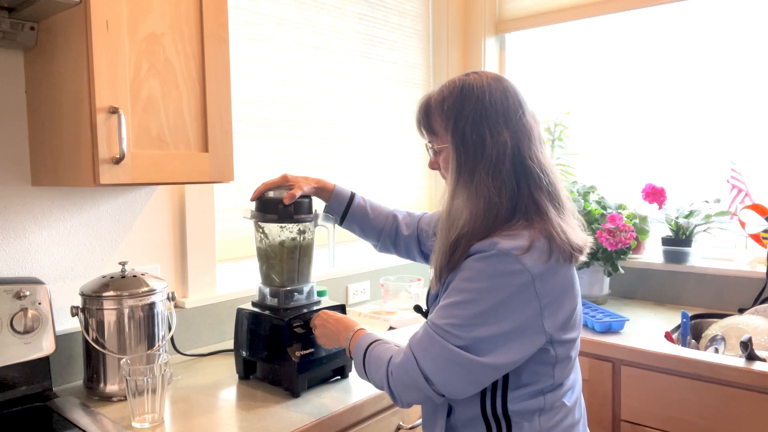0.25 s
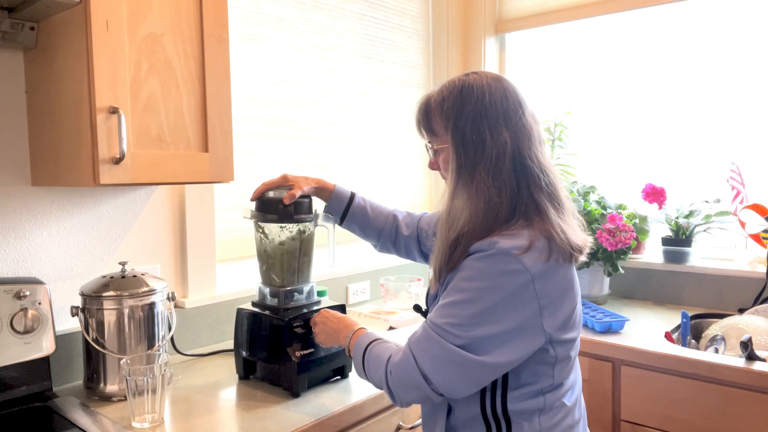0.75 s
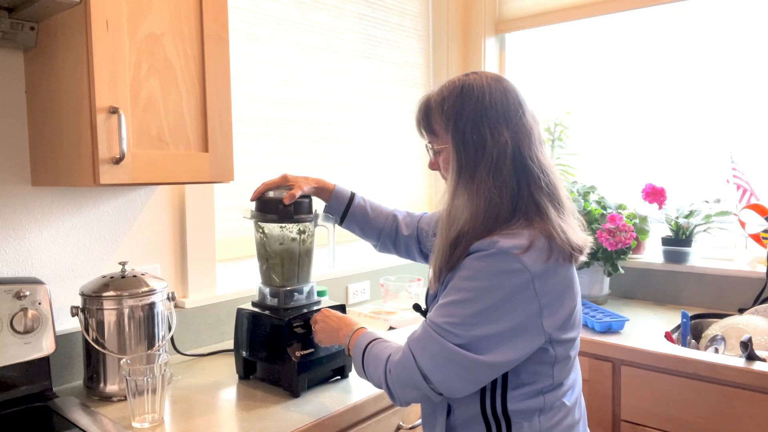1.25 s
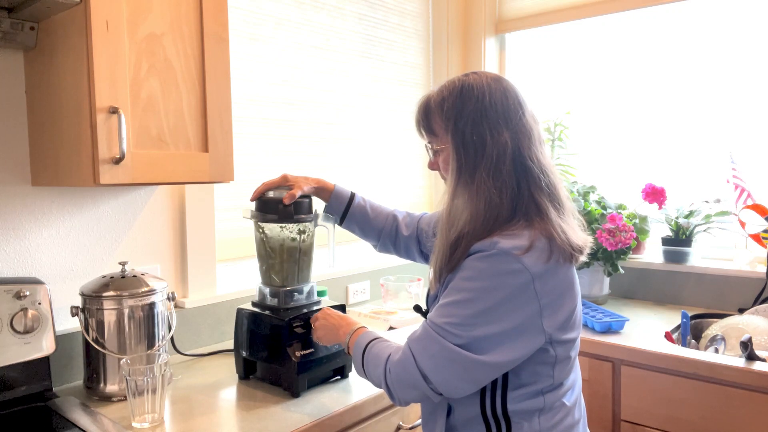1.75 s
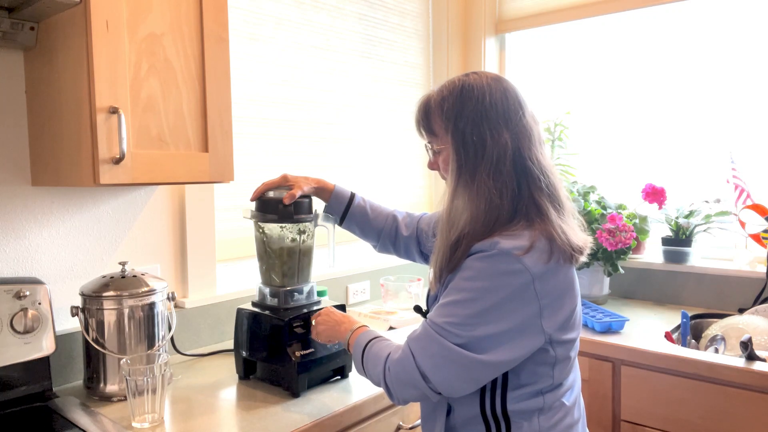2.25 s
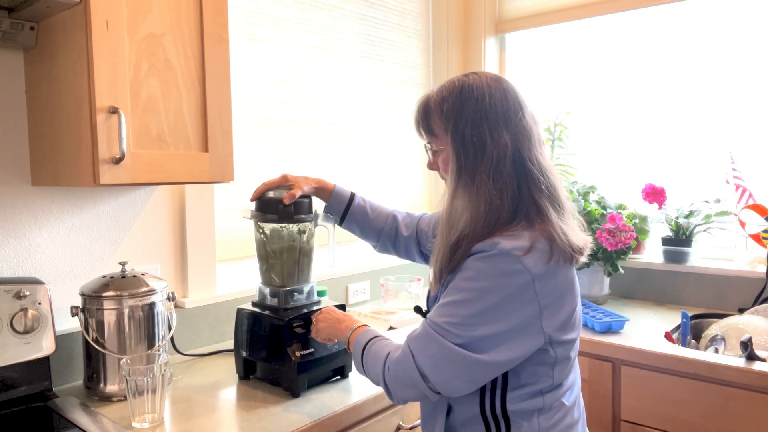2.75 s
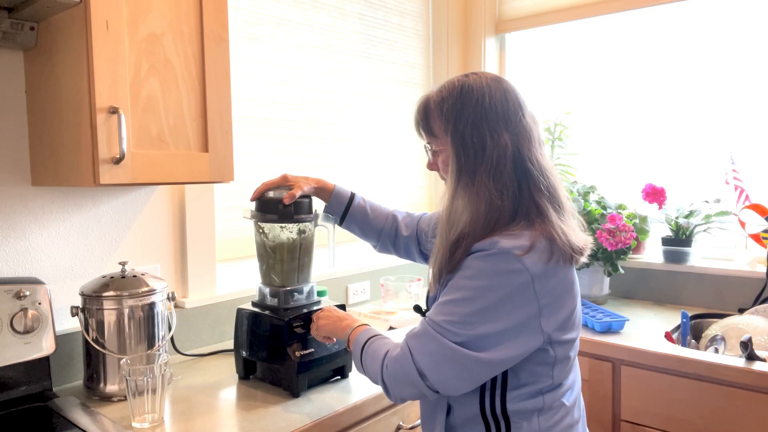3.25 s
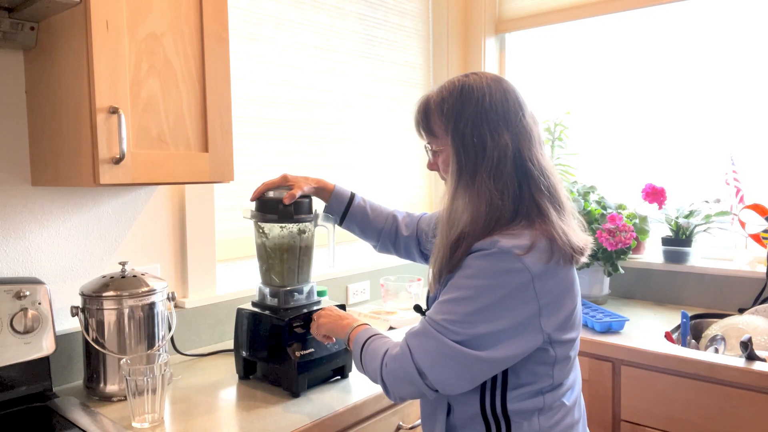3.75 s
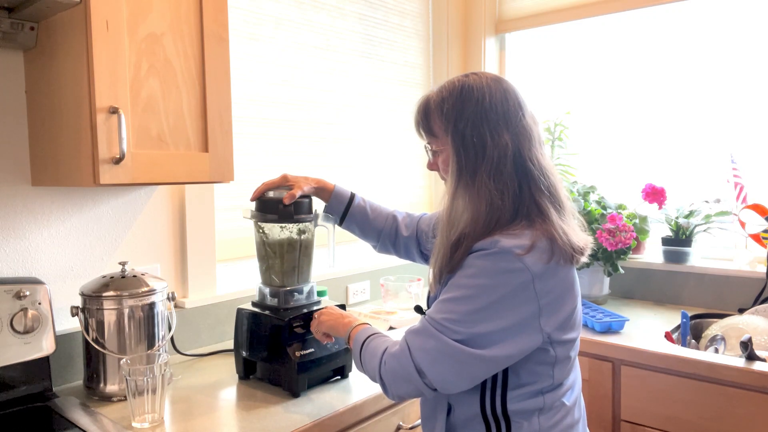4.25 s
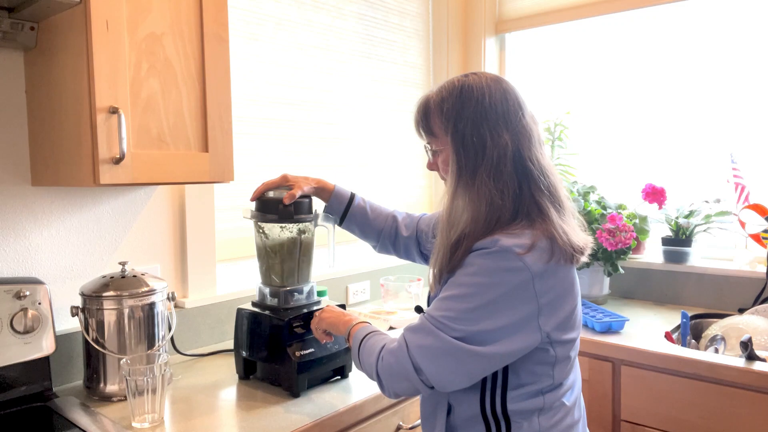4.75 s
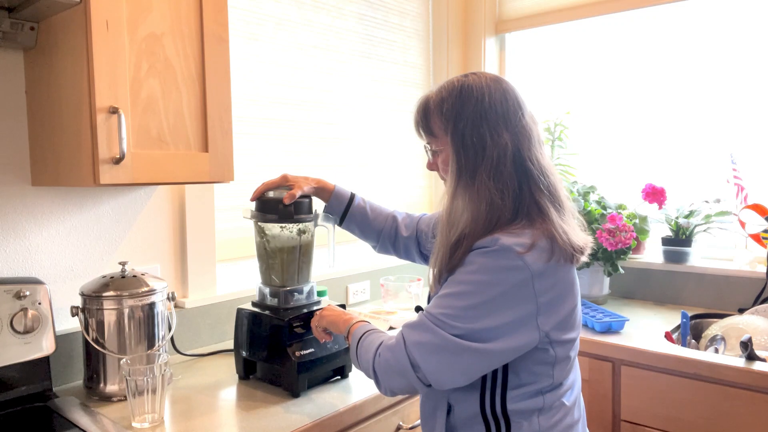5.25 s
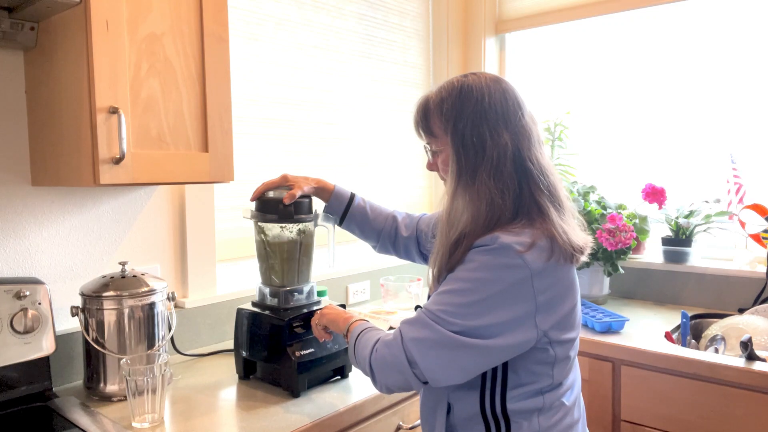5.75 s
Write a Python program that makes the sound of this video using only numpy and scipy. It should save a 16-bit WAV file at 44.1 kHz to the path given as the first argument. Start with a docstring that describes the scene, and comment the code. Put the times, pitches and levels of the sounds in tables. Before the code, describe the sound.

In a small kitchen, close and fairly dry, ice and fruit crunch in a blender jar: sharp cracks, gritty crackle, hollow gulps and wet slosh in uneven bursts. Crunching is densest from one to four seconds, thins out, then surges around five. A faint pulsing motor whir underneath slowly grows.

```python
"""Ice and fruit crunch, crackle and slosh in a blender jar, over a faint pulsing whir that slowly grows.
Dense random collisions are coloured into slosh, grit and fizz, and swell in short crunches and between them.
Noise bursts make chunks crack and bright clinks ring; gliding sines make air pockets gulp; noise makes the
jar roar. The motor is resonant noise pulsing with the shaft; a short noise tail makes the kitchen answer."""
import sys
import numpy as np
from scipy import signal
from scipy.fft import rfft, irfft, next_fast_len
from scipy.io import wavfile
from scipy.ndimage import uniform_filter1d, minimum_filter1d

SR = 44100
rng = np.random.default_rng(int(sys.argv[2]) if len(sys.argv) > 2 else 0)


def store_wav(level_fs):
    """Save 16-bit WAV to argv[1]."""
    pcm = np.round(np.clip(np.atleast_2d(level_fs), -1, 1) * 32767)
    wavfile.write(sys.argv[1], SR, pcm.T.astype(np.int16))


N = 264159

# batches of ice caught and ground by the blade, levels before each layer's trim:
# start t/s, length t/s, grit level/dB, slosh level/dB, fizz of the finest splinters level/dB
CRUNCH_BATCHES = [(0.126, 0.031, -11, -11, -32), (0.395, 0.073, -19.5, -12.5, -24),
                  (0.506, 0.089, -18.5, -7.5, -21.5), (0.702, 0.066, -20.5, -10, -31),
                  (0.838, 0.11, -22, -12.5, -32), (0.953, 0.074, -16, -3.5, -21),
                  (1.072, 0.048, -12, -3, -17), (1.199, 0.046, -13.5, -4.5, -22),
                  (1.328, 0.055, -27, -8.5, -15), (1.479, 0.044, -15.5, -7, -18),
                  (1.531, 0.068, -15, -8.5, -19), (1.627, 0.025, -22, -25, -8.5),
                  (1.75, 0.11, -23.5, -24, -25), (1.844, 0.033, -16.5, -12, -17),
                  (2.138, 0.044, -21, -10.5, -28), (2.254, 0.068, -13.5, -4.5, -17),
                  (2.386, 0.11, -21, -11, -26), (2.508, 0.069, -21, -27, -22), (2.587, 0.038, -2, -8, -4.5),
                  (2.696, 0.062, -13.5, -9, -15.5), (2.765, 0.063, -19, -8, -29),
                  (2.834, 0.06, -13, -3.5, -19), (2.912, 0.1, -20, -10.5, -21),
                  (3.088, 0.039, -11.5, -9, -18), (3.201, 0.093, -16, -14, -13.5),
                  (3.373, 0.18, -19, -6, -19.5), (3.568, 0.075, -21, -5.5, -24),
                  (3.774, 0.067, -13.5, -15, -18), (3.847, 0.071, -14.5, -8.5, -11.5),
                  (4.073, 0.15, -26, -14.5, -47), (4.633, 0.042, -18, -12, -21),
                  (4.828, 0.09, -11.5, -11.5, -16.5), (4.938, 0.051, -22, -26, -27),
                  (5.038, 0.035, 2.5, -2.5, -3), (5.074, 0.14, -15.5, -9, -21),
                  (5.392, 0.087, -19.5, -10, -18), (5.435, 0.049, -13, -7, -42)]
# resonances of the steel blade: f/Hz, width f/Hz, level/dB
BLADE_MODES = [(1952, 72, 2), (2833, 200, -0.5), (4230, 490, -10), (5875, 148, 6)]
# resonances of the jar wall: f/Hz, width f/Hz, level/dB
WALL_MODES = [(581, 17, -7.5), (715, 230, -5), (1105, 42, -14), (1340, 240, -3)]
# colour of hard fragments, relative: f/Hz, level/dB
GRIT_COLOUR = [(900, -7), (1900, 2), (6300, 3), (7600, -12.5), (13000, -1)]
# dull colour of blows and scouring on the jar, relative: f/Hz, level/dB
KNOCK_COLOUR = [(170, -33), (300, 4), (900, 8.5), (1500, -7.5), (3500, -26)]
# central pitch in Hz and its random spread (natural log), for slaps and for knocks on the jar
SLAP_HZ, SLAP_SPREAD = 750.8, 0.28


def churn():
    """Dense little collisions: soft ones slosh and bubble, hard ones crackle as grit."""
    crunch_slosh, crunch_grit, crunch_fizz = crunching()
    stir_slosh, stir_grit = stirring()
    slosh = np.hypot(crunch_slosh, stir_slosh) * sloshing()
    grit, fizz = grinding()
    return slosh, crunch_grit * grit + crunch_fizz * fizz + stir_grit * swirling()


def crunching(grit_db=-5, slosh_db=-6, fizz_db=-4):
    """Gains of slosh, grit and fizz while the blade works through each batch of ice."""
    power = np.zeros((3, N))
    for s, length, grit, slosh, fizz in CRUNCH_BATCHES:
        soft = bite(s, length, attack_s=0.0066, sag_db_per_s=16, release_s=0.0097)
        hard = bite(s, length, attack_s=0.019, sag_db_per_s=64, release_s=0.0041)
        gains = [amp(slosh + slosh_db) * soft, amp(grit + grit_db) * hard, amp(fizz + fizz_db) * hard]
        power += np.square(gains)
    return np.sqrt(power)


def bite(start_s, length_s, attack_s, sag_db_per_s, release_s):
    """Envelope of one crunch: the blade catches, the batch wears down, the rest falls away."""
    age = np.maximum(np.arange(N) / SR - start_s, 0)
    wear = amp(-sag_db_per_s * (np.minimum(age, length_s) - length_s / 2))
    release = np.exp(-np.maximum(age - length_s, 0) / release_s)
    return np.minimum(age / attack_s, 1) * wear * release


def stirring(grit_db=-2, slosh_db=-2, lull_db=-7.5, lull_lead_s=0.012, lull_width_s=0.0075):
    """Gains of slosh and grit as the slurry circulates; they lull just before every crunch."""
    # steady stirring, levels before the trims and lulls: t/s, slosh level/dB, grit level/dB
    circulation = [(0.0, -31, -39), (0.43, -38, -43), (0.73, -24.5, -35), (1.03, -19.5, -25.5),
                   (1.48, -15.5, -34.5), (1.98, -39.5, -39), (2.17, -31.5, -41), (2.38, -13.5, -29),
                   (2.69, -16.5, -25), (3.27, -27.5, -28.5), (3.42, -22, -32), (3.97, -25.5, -24),
                   (4.39, -31, -34.5), (4.69, -27, -32), (5.04, -10, -19), (5.25, -26, -27),
                   (5.69, -19.5, -24), (5.99, -21, -27.5)]
    t = np.arange(N) / SR
    s, slosh, grit = np.transpose(circulation)
    # the blade spins in an air pocket just before it catches
    starts = [batch[0] for batch in CRUNCH_BATCHES]
    lull = lull_db * sum(np.exp(-((t - start + lull_lead_s) / lull_width_s) ** 2) for start in starts)
    return amp(np.interp(t, s, slosh) + lull + slosh_db), amp(np.interp(t, s, grit) + lull + grit_db)


def sloshing():
    """Bubbles ring, soft lumps knock, and the jar wall resonates with the slurry."""
    # colour of the wet slurry, relative: f/Hz, level/dB
    slurry_colour = [(180, -33.5), (245, 7), (420, 5), (560, -10.5), (740, -1), (1100, -10), (1900, -17),
                     (4000, -38)]
    bubbles = rings(count=2400, low_hz=199.4, high_hz=2617, t60=0.092)
    # soft lumps of fruit knock against the wall
    knocks = unit(rng.standard_normal(N) * clumps(rate=83, decay_s=0.0018))
    slurry = shaped(bubbles + amp(3) * knocks, slurry_colour)
    slosh = unit(slurry + resonated(slurry, WALL_MODES))
    # level out the slosh so that no single surge stands out
    surge = np.sqrt(np.abs(uniform_filter1d(slosh ** 2, size=900)) + 0.5)
    return unit(slosh / surge)


def grinding(fizz_hz=8150):
    """Clumped hard impacts crackle; the finest splinters, above fizz_hz, are split off as fizz."""
    # grit comes in tiny clumps, one for each fragment that meets the blade
    catches = clumps(rate=170, decay_s=0.0012) + 0.7
    crackle = grains(N, rate=10000, spread_db=0.5) * catches
    grit = shaped(tumbling(crackle, depth_db=6.0), GRIT_COLOUR)
    fizz = irfft(rfft(grit) * (np.fft.rfftfreq(N, 1 / SR) > fizz_hz), N)
    return unit(grit - fizz), unit(fizz)


def swirling():
    """Fine crumbs swirl past more evenly, dulled by the slurry, and keep the steel singing."""
    # dulling of grit that is only stirred, relative: f/Hz, level/dB
    submerged = [(1500, 9), (6000, 4), (13000, 3.5)]
    catches = clumps(rate=220, decay_s=0.002) + 0.73
    swirl = grains(N, rate=10000, spread_db=6.0) * catches
    fines = shaped(shaped(tumbling(swirl, depth_db=4.5), GRIT_COLOUR), submerged)
    return unit(fines + amp(-6.5) * resonated(fines, BLADE_MODES))


def rings(count, low_hz, high_hz, t60):
    """Many short damped tones at random moments, each with a pitch of its own."""
    t = np.arange(SR // 20) / SR
    when, pitch, phase = rng.random((3, count, 1))
    hz = low_hz + pitch * (high_hz - low_hz)
    tones = amp(-60 * t / t60) * np.sin(2 * np.pi * (hz * t + phase))
    index = (when * N).astype(int) + np.arange(len(t))
    return unit(np.bincount(index.ravel(), tones.ravel(), N)[:N])


def clumps(rate, decay_s):
    """An envelope of rms 1: sudden uneven catches, rate a second, that each die away."""
    catches = np.abs(grains(N, rate, spread_db=5.5))
    return unit(signal.lfilter([1], [1, -np.exp(-1 / (decay_s * SR))], catches))


def tumbling(x, depth_db):
    """Fragments come and go, each lending its own colour for a few hundredths of a second."""
    z = signal.stft(x, nperseg=512)[2]
    field = uniform_filter1d(rng.standard_normal(z.shape), size=8, axis=1)
    field = uniform_filter1d(field, size=3, axis=1)
    # narrow peaks sit on broader humps
    peaks = unit(uniform_filter1d(field, size=2, axis=0))
    humps = unit(uniform_filter1d(field, size=14, axis=0))
    colour_db = depth_db * np.clip(unit(peaks + 0.5 * humps), -2, 2)
    return signal.istft(z * amp(colour_db), nperseg=512)[1][:N]


def cracks(snap_s=0.0019, crumb_s=0.018, crumb_db=-18, knock_db=-6, ring_db=-8, ring_width_hz=110):
    """Each chunk splits with a dry snap, rings briefly, sheds a spray of crumbs and knocks the jar."""
    # chunks split by the blade: t/s, relative level/dB, pitch of the chunk f/Hz
    splits = [(0.121, -15, 4670), (0.1372, -9.5, 4650), (0.145, -8.5, 2740), (0.1969, -23.5, 6070),
              (0.2632, -13, 1860), (0.4375, -12, 5230), (0.4546, -8.5, 3450), (0.5134, -7, 6040),
              (0.5211, -7.5, 5000), (0.7391, -4.5, 1900), (0.8354, -8.5, 2320), (0.8639, -6.5, 2420),
              (0.944, -10.5, 2380), (0.971, -12, 3020), (1.1089, -9.5, 3340), (1.1766, -6, 2340),
              (1.205, -1, 2490), (1.2092, -4, 5000), (1.232, -6, 2270), (1.2684, -15, 2430),
              (1.4849, 2, 4620), (1.4951, -0.5, 1830), (1.5333, -10, 1380), (1.5488, -7, 1430),
              (1.8573, -9, 4860), (1.869, -13, 1350), (2.1527, -10, 1420), (2.2392, -13.5, 3800),
              (2.257, -3, 4660), (2.3127, -5.5, 2240), (2.3924, -8, 1380), (2.3983, -8, 1420),
              (2.4397, 0, 5190), (2.445, -2.5, 6420), (2.464, -5, 1430), (2.5272, -3, 1390),
              (2.596, -4, 2180), (2.6103, 0.5, 5890), (2.7019, 0.5, 3230), (2.7106, -6, 2900),
              (2.7386, -7, 1390), (2.858, -6.5, 1490), (2.9593, -8, 3570), (3.04, -11, 1380),
              (3.1168, -17, 3140), (3.202, -18, 1410), (3.243, -15.5, 2110), (3.3778, -2, 1400),
              (3.4615, -6.5, 2880), (3.5664, -2, 1730), (3.656, -15, 3440), (3.865, 3, 2480),
              (3.902, -9, 3120), (3.9282, -7.5, 5440), (4.0993, -10.5, 4250), (4.795, -15, 7000),
              (4.827, -12, 3230), (4.8527, -2, 3100), (4.879, -2.5, 1370), (4.9543, 0, 4180),
              (5.0609, 3.5, 6560), (5.1797, -7, 1760), (5.2145, -12, 4400), (5.4566, 5.5, 1810)]
    # colour of breaking ice, relative: f/Hz, level/dB
    ice_colour = [(150, -50), (400, -13), (1500, 12.5), (6200, 4), (7700, -2), (13500, 1.5)]
    out, t = np.zeros(N), np.arange(SR // 10) / SR
    for s, db, chunk_hz in splits:
        snap = rng.standard_normal(len(t)) * np.exp(-t / snap_s)
        crumbs = grains(len(t), rate=3400, spread_db=0) * np.exp(-t / crumb_s)
        blow = snap + amp(crumb_db) * crumbs
        split = struck(blow, ice_colour, chunk_hz, focus_db=7, facet_db=5.5)
        ring = crest(resonated(blow, [(chunk_hz, ring_width_hz, 0)]))
        thud = knock(decay_s=0.00057)
        add(out, s, amp(db) * (split + amp(ring_db) * ring + amp(knock_db) * thud))
    return out


def gulps(lead_s=0.0012, hollow_db=-7, wet_db=-3.0, knock_db=-4.5):
    """Each collapse is a hollow gulp; the slurry slaps the jar and small pockets burst with it."""
    # air pockets collapsing and wet slaps on the jar, loud and faint, levels before the trims:
    # t/s, gulp level/dB, cavity pitch f/Hz (raised to the pocket's floor), wet slap level/dB
    collapses = [(0.004, -18.5, 368, -17.5), (0.12, -4, 422, -34), (0.186, -12, 237, -49),
                 (0.262, -8.5, 328, -11.5), (0.413, 2.5, 415, -7), (0.515, -6.5, 246, -10.5),
                 (0.546, -4.5, 472, -22), (0.641, -5.5, 329, -51), (0.726, 1.5, 310, -5.5),
                 (1.013, -13, 387, -17), (1.082, 1.5, 412.6, -39), (1.177, -2, 335, -7.5),
                 (1.203, -14, 317, -6), (1.346, -7.5, 323, -12.5), (1.487, -7.5, 322, -15.5),
                 (1.547, -4.5, 571, -10), (1.578, -11, 566, -6.5), (1.637, -11, 526, -10.5),
                 (1.683, -10.5, 328, -45), (1.751, -9.5, 357, -50), (1.852, -4.5, 323, -28),
                 (1.976, -13.5, 787, -20.5), (2.15, 5, 397.7, -15), (2.353, -4, 290, -32),
                 (2.393, 0, 437.5, -8), (2.506, -8, 282, -7.5), (2.527, -0.5, 256, -7.5),
                 (2.602, 1, 374, -14), (2.754, -0.5, 279.6, -8), (2.787, 2, 353, -9.5),
                 (2.934, -4.5, 346, -8.5), (3.035, -12, 400, -23), (3.102, 1, 403, -25),
                 (3.147, -1.5, 433, -17.5), (3.278, -6.5, 313, -36), (3.393, -3, 336, -11),
                 (3.606, 0, 389, -13), (3.725, -36, 370, -10.5), (3.835, -2, 295, -15.5),
                 (3.955, -6, 333, -19), (4.033, -11, 375, -44), (4.135, -2, 323, -18.5),
                 (4.167, -10, 420, -9.5), (4.227, -7.5, 390, -16.5), (4.431, -7, 336, -22.5),
                 (4.576, -10, 308, -34), (4.668, -4.5, 329, -17.5), (4.846, 2.5, 279, -37),
                 (4.953, -3, 427, -9), (5.186, -6.5, 297, -15), (5.415, -2.5, 257.4, -16),
                 (5.271, -7.5, 358, -23), (5.46, -3, 331, -11), (5.535, -24, 340, -13),
                 (5.6, -6.5, 241.6, -18), (5.655, -1.5, 308, -16.5), (5.688, -1.5, 349, -37),
                 (5.733, -2.5, 312, -13), (5.844, -6.5, 310, -32)]
    out = np.zeros(N)
    for s, db, cavity_hz, slap_db in collapses:
        slap_hz = SLAP_HZ * np.exp(SLAP_SPREAD * rng.standard_normal())
        bursts = pocket(slap_hz, rise_s=0.00078, t60=0.076, splinter_db=-2.5, lag_s=0.016)
        add(out, s - lead_s, amp(db + hollow_db) * pocket(cavity_hz))
        add(out, s, amp(slap_db + wet_db) * bursts)
        add(out, s, amp(slap_db + knock_db) * knock(decay_s=0.0078))
    return out


def pocket(cavity_hz, rise_s=0.00456, t60=0.12, scatter=0.3597, splinter_db=-9, glide=0.071, lag_s=0.0125):
    """A cavity swells and rings down; smaller and larger pockets break off around it."""
    t = np.arange(SR // 7) / SR
    pitch, bend = rng.standard_normal((2, 6, 1))
    delay, phase = rng.random((2, 6, 1))
    pitch[0], delay[0] = 0, 0  # the main cavity
    age = np.maximum(t - lag_s * delay, 0)
    base_hz = np.maximum(cavity_hz * np.exp(scatter * np.clip(pitch, -2, 1)), 240)  # 240 Hz floor
    # the pitch bends as the slurry squeezes each pocket
    hz = base_hz * (1 + glide * bend * np.tanh(2 * age / t60))
    swell = np.minimum(age / rise_s, 1) ** 2 * amp(-60 * np.maximum(age - rise_s, 0) / t60)
    pockets = swell * np.sin(2 * np.pi * (np.cumsum(hz, 1) / SR + phase))
    return crest(pockets[0] + amp(splinter_db) * pockets[1:].sum(0), size=420)


def clinks(chatter_s=0.019, chatter_db=-7, spread=0.059, sharpness=27):
    """A sharp noise contact with a chattering tail rings in a cluster of close modes."""
    # ringing clinks, and two bright sprays above 10 kHz: t/s, level/dB before a 2 dB lift, pitch f/Hz
    bright_hits = [(0.2614, -16, 2120), (0.332, -28, 2640), (1.3666, -14, 2960), (1.416, -20, 2930),
                   (1.7564, -19.5, 2900), (1.772, -20.5, 4350), (1.797, -20.5, 2990), (1.822, -27, 2930),
                   (2.082, -29.5, 6050), (3.216, -17.5, 6020), (4.139, -22, 12200), (4.232, -18, 2780),
                   (4.448, -22, 5880), (4.639, -21, 5850), (4.7393, -19, 5940), (5.305, -23, 5930),
                   (5.362, -14, 4100), (5.657, -23, 10800), (5.811, -22.5, 3090)]
    out, t = np.zeros(N), np.arange(SR // 10) / SR
    for s, db, pitch_hz in bright_hits:
        envelope = np.exp(-t / 0.0019) + amp(chatter_db) * np.exp(-t / chatter_s)
        contact = rng.standard_normal(len(t)) * envelope
        side_hz = pitch_hz * np.exp(spread * rng.standard_normal(size=3))
        modes = [(pitch_hz, pitch_hz / sharpness, 2)] + [(hz, hz / sharpness, -2) for hz in side_hz]
        add(out, s, amp(db + 2.0) * crest(resonated(contact, modes)))
    return out


def roars():
    """Packed ice scours the jar so densely that its wall roars in its own resonances."""
    # packed ice against the wall: start t/s, length t/s, relative level/dB
    scours = [(2.517, 0.03, -22), (3.097, 0.039, -20), (3.2, 0.025, -14.5), (3.386, 0.027, -18.5),
              (4.844, 0.38, -17)]
    drive = np.zeros(N)
    for s, length, db in scours:
        drive += amp(db) * bite(s, length, attack_s=0.0068, sag_db_per_s=18, release_s=0.0054)
    return drive * unit(resonated(shaped(rng.standard_normal(N), KNOCK_COLOUR), WALL_MODES))


def knock(decay_s):
    """A short dull blow on the wall of the jar, hollowed out around a random pitch."""
    t = np.arange(SR // 10) / SR
    wall_hz = SLAP_HZ * np.exp(SLAP_SPREAD * rng.standard_normal())
    blow = rng.standard_normal(len(t)) * np.exp(-t / decay_s)
    return struck(blow, KNOCK_COLOUR, wall_hz, focus_db=-12, facet_db=4.5)


def struck(blow, spectrum, focus_hz, focus_db, facet_db):
    """A blow coloured by its object: a broad peak or hollow at focus_hz, and random uneven facets."""
    facet_hz, octaves = np.geomspace(300, 16000, num=30), .6
    facets = np.transpose([facet_hz, facet_db * (2 * rng.random(len(facet_hz)) - 1)])

    def gain(hz):
        focus = focus_db / (1 + (np.log2((hz + 1) / focus_hz) / octaves) ** 2)
        return amp(along(spectrum, hz) + focus + along(facets, hz))

    return crest(coloured(blow, gain))


def motor(shaft_hz=157, pulsing=0.23):
    """Cooling air sings in the steel, pulsing with the shaft, growing clearly louder, by about 11 dB overall."""
    # colour of the rushing air, relative: f/Hz, level/dB
    whir = [(30, -71), (260, 37), (800, 28.5), (3000, -17), (6000, -8), (8000, -10)]
    t = np.arange(N) / SR
    air = unit(shaped(rng.standard_normal(N), whir))
    # the shaft speed wanders around its mean
    drift = uniform_filter1d(rng.standard_normal(N), size=4000)
    turns = np.cumsum(shaft_hz * (1 + 0.1192 * unit(drift))) / SR
    pulse = 1 + pulsing * np.sin(2 * np.pi * turns)
    return amp(-42.5 + 1.84 * t) * pulse * (air + resonated(air, BLADE_MODES))


def kitchen(x):
    """Cupboards and counter answer after 4 ms with a short noise tail, decaying at its own rate per band."""
    # decay of the room by 60 dB: f/Hz, t/s
    decay_times = [(200, 0.16), (3000, 0.17), (14000, 0.081)]
    hz, t, z = signal.stft(rng.standard_normal(SR // 2), SR, nperseg=256)
    decay = amp(-60 * t / along(decay_times, hz)[:, None])
    tail = signal.istft(z * decay, SR, nperseg=256)[1]
    return signal.fftconvolve(x, np.pad(tail / np.linalg.norm(tail), (SR // 250, 0)))[:N]


def amp(db):
    """Decibels to gain."""
    return 10 ** (np.asarray(db) / 20)


def unit(x):
    """Scaled to rms 1."""
    return x / np.sqrt(np.mean(x ** 2) + 1e-20)


def crest(x, size=80):
    """Scaled so that the loudest stretch of size samples has rms 1."""
    return x / np.sqrt(uniform_filter1d(x ** 2, size, mode="constant").max() + 1e-20)


def along(points, hz):
    """(Hz, value) points on a log axis."""
    f, v = np.transpose(points)
    return np.interp(np.log(hz + 1), np.log(f + 1), v)


def coloured(x, gain):
    """x through the causal minimum-phase filter whose magnitude is gain(Hz)."""
    m = 2 * next_fast_len(len(x) // 2 + 2048)
    cepstrum = irfft(np.log(np.maximum(gain(np.fft.rfftfreq(m, 1 / SR)), 1e-6)), m)
    # folding the cepstrum onto positive time makes the filter causal
    cepstrum[1:m // 2] *= 2
    cepstrum[m // 2 + 1:] = 0
    return irfft(rfft(x, m) * np.exp(rfft(cepstrum)), m)[:len(x)]


def shaped(x, spectrum):
    """x coloured by (Hz, dB) points."""
    return coloured(x, lambda hz: amp(along(spectrum, hz)))


def resonated(x, modes):
    """x ringing in a body's (Hz, width Hz, dB) resonances."""
    m = 2 * len(x)
    f = np.fft.rfftfreq(m, 1 / SR)
    response = sum(amp(db) * 1j * f * w / (hz * hz - f * f + 1j * f * w) for hz, w, db in modes)
    return irfft(rfft(x, m) * response, m)[:len(x)]


def grains(size, rate, spread_db):
    """Random impacts, rate a second, with strengths scattered by spread_db; rms 1 overall."""
    strength = amp(spread_db * np.clip(rng.standard_normal(size), -2, 2))
    hits = rng.random(size) < rate / SR
    return unit(hits * strength * rng.choice([-1, 1], size))


def add(track, s, x):
    """Mix x into the track from time s on."""
    start = round(s * SR)
    x, start = x[max(-start, 0):], max(start, 0)
    track[start:start + len(x)] += x[:max(N - start, 0)]


def scene():
    """Ice and slurry sound through the jar and the room answers them; the motor runs beneath."""
    # how well the jar passes on the bass: f/Hz, level/dB
    jar_bass = [(30, -15), (90, -16), (130, -4), (162, -22.5), (225, 0)]
    slosh, grit = churn()
    ice = amp(-3) * cracks() + clinks() + grit
    ringing_ice = ice + amp(-7.5) * resonated(ice, BLADE_MODES)
    jar = shaped(ringing_ice + gulps() + slosh + roars(), jar_bass)
    return (jar + amp(-17.5) * kitchen(jar) + motor())[None]


def record(dry, top_hz=16400, ceiling=.99):
    """The top treble falls away steeply, a limiter holds the peaks down, nothing passes above top_hz."""
    # treble roll-off: f/Hz, level/dB
    treble = [(12000, -1), (13900, -8), (14700, -24), (16400, -53)]
    hz = np.fft.rfftfreq(N, 1 / SR)
    heard = irfft(rfft(dry[0]) * amp(along(treble, hz)), N)
    needed = 1 / np.maximum(np.abs(heard) / ceiling, 1)
    # hold the lowest gain around each peak, then smooth it
    held = minimum_filter1d(needed, size=140)
    gain = uniform_filter1d(uniform_filter1d(held, size=70), size=70)
    return irfft(rfft(heard * gain) * (hz < top_hz), N)[None]


dry = scene()
out = record(dry)
store_wav(out)
```